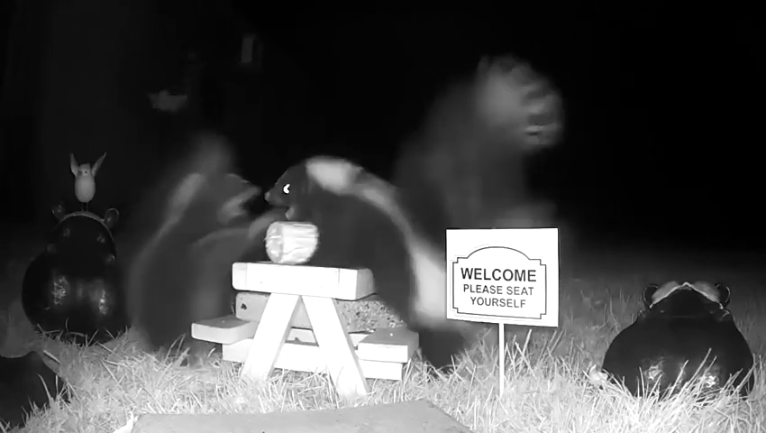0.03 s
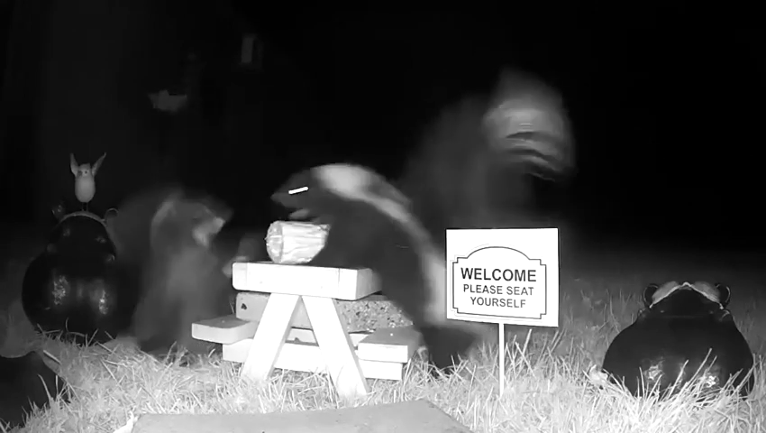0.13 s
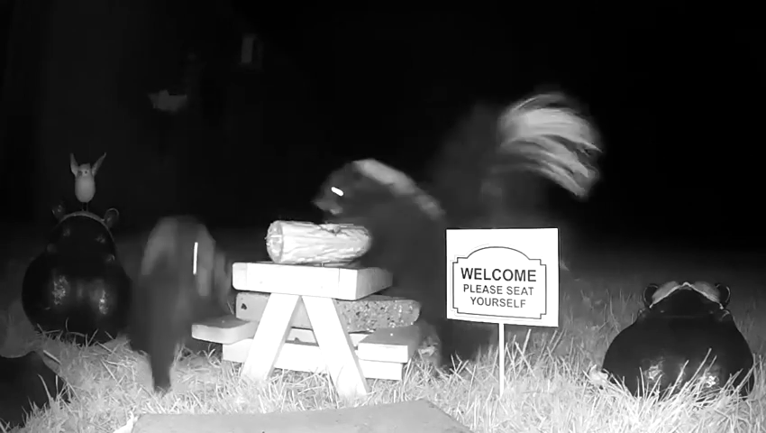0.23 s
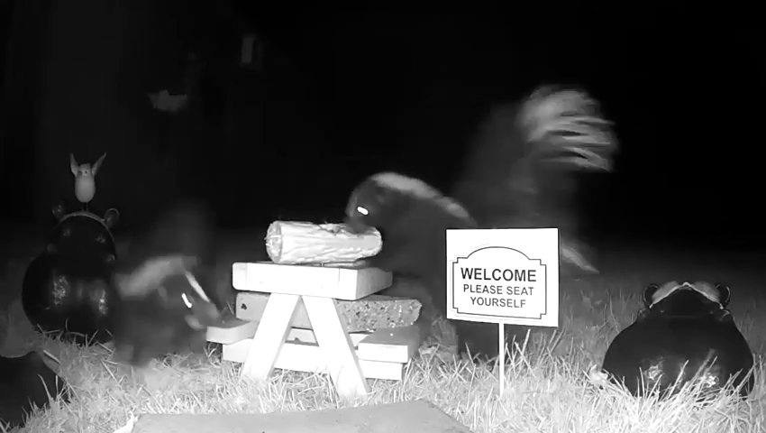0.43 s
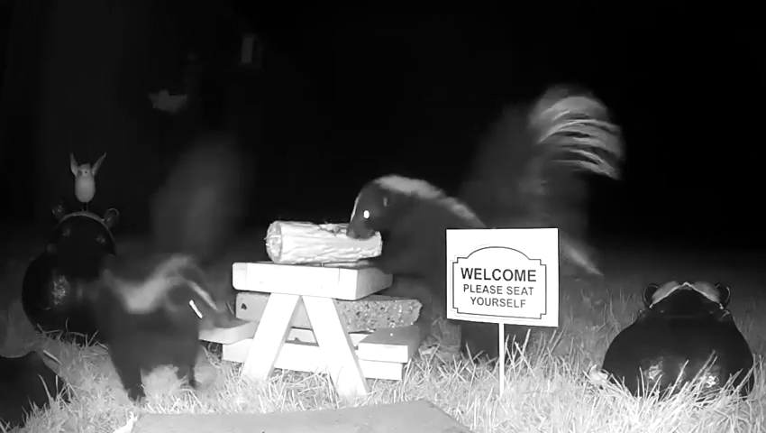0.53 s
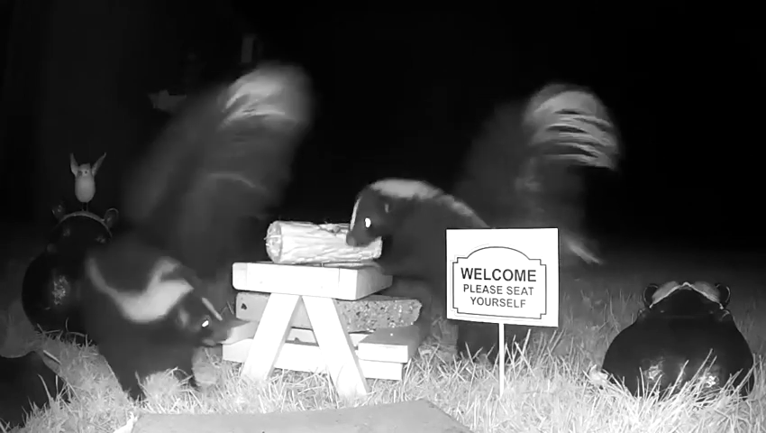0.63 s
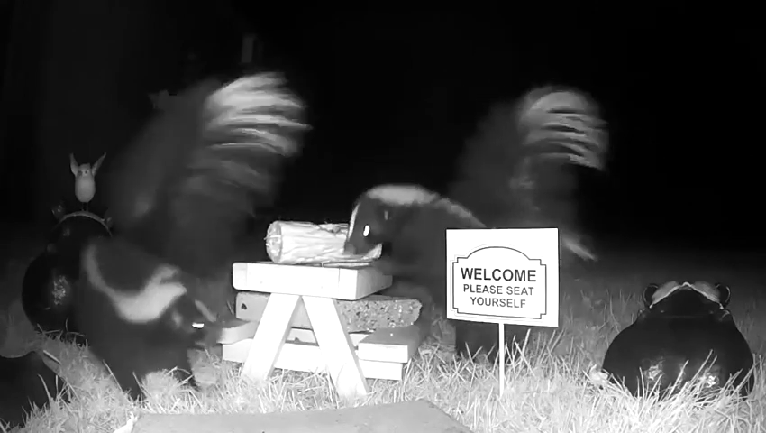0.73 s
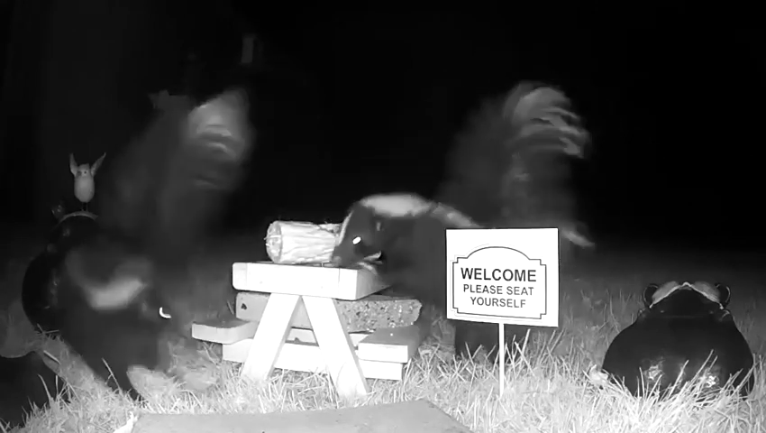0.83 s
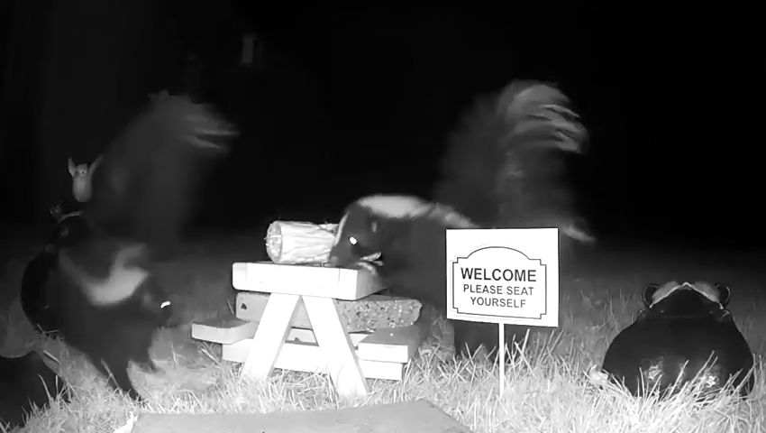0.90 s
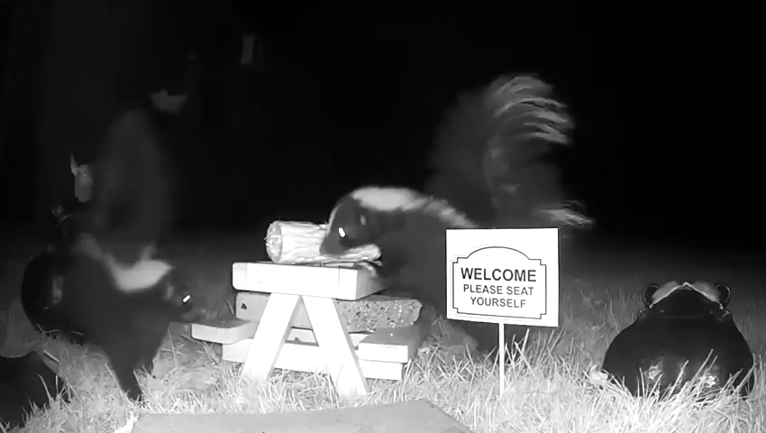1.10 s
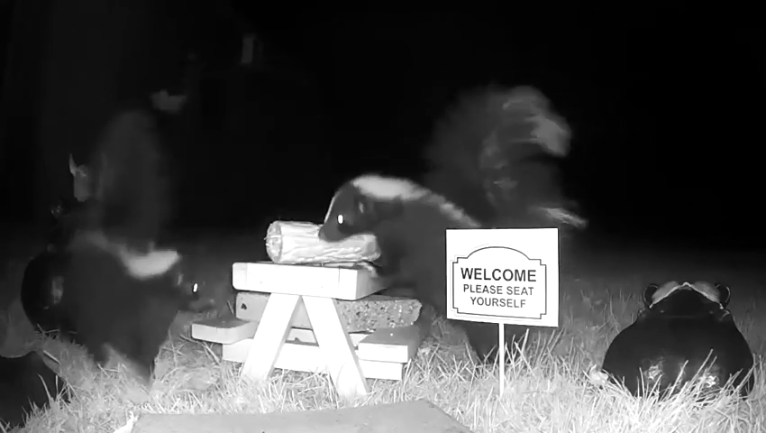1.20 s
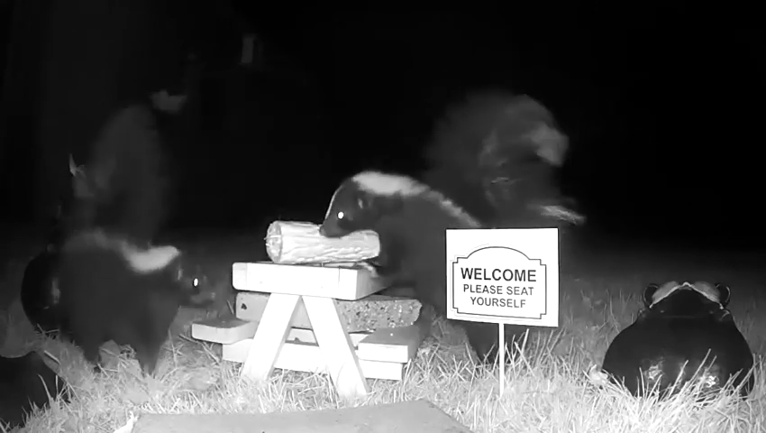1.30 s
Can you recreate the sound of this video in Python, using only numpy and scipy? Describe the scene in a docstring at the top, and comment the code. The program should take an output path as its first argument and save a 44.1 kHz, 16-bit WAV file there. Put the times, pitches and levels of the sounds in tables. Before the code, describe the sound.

A squabbling skunk chirps sharply twice, paws rustling and thumping in grass, steady low hiss behind

```python
"""Skunks squabbling at night

Two skunks squabble over food on a lawn, close to a small outdoor camera. One squeaks twice:
a shrill, wavering sine whistle that a fast flutter chops into bursts, loudest just before it stops.
Shaped noise makes the paws scuff and tick in the grass; fading sines make a stamp, knocks and footfalls.
Scattered reflections add a faint echo from the yard, over a steady hiss of shaped noise."""
import sys
import numpy as np
from scipy import signal
from scipy.fft import rfft, irfft
from scipy.io import wavfile

SR = 44100
rng = np.random.default_rng(int(sys.argv[2]) if len(sys.argv) > 2 else 0)


def wav_record(signal):
    """Record a signal, one row per channel, as 16-bit PCM in the file named by sys.argv[1]."""
    frames = np.transpose(np.atleast_2d(signal))
    bounded = np.clip(frames, -1, 1)
    # unit amplitude maps onto the largest positive 16-bit level
    quanta = np.round(bounded * 32767).astype(np.int16)
    wavfile.write(sys.argv[1], SR, quanta)


N = 59535
T = np.arange(N) / SR  # time of every sample [s]

# The two squeaks, before the throat filter: (time [s], level [dB], average flutter [Hz],
# whistle pitch [Hz], roughness [0-1], overtone level [dB], overtone pitch [Hz])
FIRST_SQUEAK = [(.2035, -12, 480, 4040, 0.34, -7, 7050), (.2055, -18.5, 520, 4100, 0.2, -11, 7080),
                (.213, -16.5, 468, 4743, 0.27, -12, 6650), (.2195, -13, 429, 4796, 0, -20, 7180),
                (.2232, -26, 440, 4810, 0.2, -5.5, 6350), (.227, -17, 500, 5030, 0, -6.5, 6290),
                (.2305, -4, 707, 4790, 0, -14, 6120), (.2355, -6, 716, 4660, 0.03, -24, 6350),
                (.2385, -32.5, 520, 4680, 0.16, 1.5, 6660)]
SECOND_SQUEAK = [(.538, -11, 386, 4200, 0.66, -5.5, 7060), (.541, -20, 370, 3435, 0.49, -0.5, 6870),
                 (.547, -15, 370, 3672, 0.83, -2.5, 6826), (.552, -15.5, 368, 4206, 0.78, -14.5, 6960),
                 (.558, -22, 371, 5164, 0.59, -5, 7030), (.563, -13, 388, 5095, 0.13, -23.5, 7030),
                 (.570, -18.5, 405, 4850, 0.23, -10.5, 6790), (.5772, -7.5, 545, 4753, 0.041, -20, 6450),
                 (.5815, -23, 446, 4306, 0.25, -10, 6550)]
# Rasp of the throat: (frequency [Hz], relative level [dB])
RASP_SPECTRUM = [(500, -37), (1700, -29), (2300, -2.5), (2750, -10), (3020, -10.5), (3200, -1.5),
                 (4400, -7.5), (5400, -8.5), (6000, -22.5), (6600, -12), (7700, -13), (9000, -25)]
# What a stamping paw rings with: (pitch [Hz], relative level [dB], time to fall 60 dB [s])
STAMP_MODES = [(371.4, 0, 0.032), (344.8, -24.5, 0.16), (851, -29, 0.053)]
# Paws dragged through grass: (start [s], length [s], crisp level [dB], dull level [dB])
SCUFF_STROKES = [(0, 0.025, -46, -51), (0.026, 0.065, -53.5, -56.5), (0.071, 0.057, -47, -55),
                 (0.129, 0.041, -47.5, -58.5), (0.173, 0.04, -54.5, -57.5), (0.214, 0.043, -41.5, -53.5),
                 (0.281, 0.047, -57, -61.5), (0.3444, .01, -51, -51.5), (0.355, 0.044, -49, -54),
                 (0.434, 0.08, -55.5, -72), (0.557, 0.054, -44, -55), (0.607, 0.03, -50, -65.5),
                 (0.891, .1, -59, -66), (0.905, 0.052, -58.5, -85)]
# Crisp sound of grass and stalks: (frequency [Hz], relative level [dB])
CRISP_SPECTRUM = [(300, -32), (1500, -24.5), (2300, 6), (3100, -13), (5200, 0), (7000, 3.5), (8000, -7)]
# Dull sound of turf: (frequency [Hz], relative level [dB])
DULL_SPECTRUM = [(30, -13.5), (60, 6.5), (150, -5), (350, -0.5), (550, -9.5), (950, -0.5), (1500, 1),
                 (2400, -9), (4000, -9.5), (8000, -35.5)]
# Dry stalks that snap: (time [s], level before halving [dB])
STALK_SNAPS = [(0.0132, -54), (0.0717, -39), (0.0918, -32), (0.141, -46), (0.152, -47.5), (.182, -28),
               (.2965, -37.5), (0.321, -33), (0.3495, -35), (0.462, -40), (0.474, -43), (0.4884, -38),
               (0.5307, -32.5)]
# Soft knocks on wooden things around the food:
# (time [s], pitch [Hz], starting level [dB], time to fall 60 dB [s])
WOOD_KNOCKS = [(.049, 1010, -45, 0.071), (0.1834, 2390, -42.5, .06), (.194, 330, -50.5, 0.11),
               (.228, 677, -38.5, 0.019), (.239, 897, -42, .06), (0.348, 1290, -44.5, .03),
               (0.371, 1442, -43.5, 0.037), (.905, 360, -55.5, 0.093), (.936, 347.4, -55, 0.12)]
# Footfalls in the turf: (time [s], level at the top of the swell [dB])
FOOTFALL_THUDS = [(0.133, -61.5), (0.204, -49.5), (0.246, -52), (0.316, -57), (0.374, -56.5),
                  (0.436, -56.5), (.58, -57), (0.908, -58.5)]
# A hard object ringing along: (pitch [Hz], time to fall 60 dB [s], level at resonance [dB])
OBJECT_RINGS = [(3035, .12, -7), (3530, .25, 2), (4372, .15, 0), (4870, .15, -22), (6772, .12, 0.5)]
# Reflections off nearby things: (delay [s], time to fall 60 dB [s], level [dB])
NEAR_REFLECTION = (.002, .05, -19.5)
# Reflections off the far side of the yard: (delay [s], time to fall 60 dB [s], level [dB])
FAR_REFLECTION = (.036, 0.24, -25.5)
# Tint of the far reflections: (frequency [Hz], relative level [dB])
FAR_SPECTRUM = [(100, 0), (2500, 3.5), (3600, 6), (4750, -4.5), (5600, -1), (8000, -8)]
# Steady hiss: (frequency [Hz], relative level [dB])
HISS_SPECTRUM = [(25, -3), (58, 0), (85, -5.5), (230, -12.5), (400, -12), (520, -17.5), (800, -14.5),
                 (1400, -16), (1850, -16.5), (2150, -8), (2450, -12), (2900, -16), (4800, -13), (6200, -13),
                 (7200, -6), (7800, -14.5), (9000, -55.5)]

BURST_S, EDGE_S = 0.00036, 0.0019  # spread of one burst; fade at each end of a squeak
JITTER = 0.089  # unevenness of the flutter, as a share of its rate
LEAK, ROUGH_LEAK = 0.022, 0.29  # share passing between bursts; extra share at full roughness
WAVER_HZ, OVERTONE_WAVER_HZ = 100.6, 204  # typical pitch waver at roughness 0.25
RASP_DB = -1.5
THROAT_HZ, THROAT_LEAK_DB = 2997, -11.5  # lower edge of the throat; what passes below it
STAMP_S, STAMP_DB, STAMP_RISE_S = .5755, -19.5, 0.0069
BLADES_PER_S, BLADE_SPREAD_DB = 5000, 2.5
SCUFF_UNEVEN_DB, SCUFF_UNEVEN_HZ = 2, 120
TICK_DECAY_S = 0.0017
KNOCK_RISE_S = 0.0038
THUD_HZ, THUD_SWELL_S, THUD_OVERTONE_DB = 52, 0.011, -8  # pitch before a random shift
FIRST_ECHO_DB, SECOND_ECHO_DB = -6.5, 1  # how much of each squeak is aimed at the far side
TAPS_PER_S = 3000  # average number of single reflections
HISS_DB = -58.5
CUT_HZ = 7900  # upper limit of the camera


def amp(db):
    """Turns decibels into a gain."""
    return 10 ** (np.asarray(db) / 20)


def unit(x):
    """Scales a sound to an average (rms) level of 1."""
    return x / np.sqrt(np.mean(x ** 2) + 1e-20)


def colour(x, points):
    """Weights the frequencies of x along a curve through the points, then sets rms 1."""
    hz, db = np.transpose(points)
    log_frequency = np.log(np.fft.rfftfreq(N, 1 / SR) + 1)
    gain = amp(np.interp(log_frequency, np.log(hz), db))
    return unit(irfft(rfft(x) * gain, N))


def wander(width_hz):
    """Makes a smooth random curve of rms 1; a larger width changes faster."""
    smoothing = np.exp(-(np.fft.rfftfreq(N, 1 / SR) / width_hz) ** 2)
    return unit(irfft(rfft(rng.standard_normal(N)) * smoothing, N))


def sine(hz):
    """Makes a sine that follows a pitch curve."""
    return np.sin(2 * np.pi * np.cumsum(hz) / SR)


def squeak(curve):
    """A whistle, its overtone and some rasp, let through in one burst per flutter."""
    times, *columns = np.transpose(curve)
    level_db, flutter, whistle_hz, rough, overtone_db, overtone_hz = (
        np.interp(T, times, column) for column in columns)
    rough = np.clip(rough, 0, 1)
    fade_in = np.clip((T - times[0]) / EDGE_S, 0, 1)
    fade_out = np.clip(1 + (times[-1] - T) / EDGE_S, 0, 1)

    uneven_flutter = flutter * (1 + JITTER * wander(300))
    turns = np.cumsum(uneven_flutter * (T > times[0])) / SR
    # Each burst is a bell shape that spans the end of one turn and the start of the next
    burst = sum(np.exp(-.5 * ((turns % 1 - k) / flutter / BURST_S) ** 2) for k in range(2))
    # Rough stretches close less well between bursts
    leak = np.clip(LEAK + ROUGH_LEAK * rough, 0, 1)
    opening = leak + (1 - leak) * burst

    waver = .5 + 2 * rough  # both tones waver more where the voice is rough
    tone = sine(whistle_hz + WAVER_HZ * waver * wander(500))
    overtone = amp(overtone_db) * sine(overtone_hz + OVERTONE_WAVER_HZ * waver * wander(500))
    rasp = amp(RASP_DB) * rough * colour(rng.standard_normal(N), RASP_SPECTRUM)
    voice = opening * np.sqrt(1 - rough ** 2) * tone + burst * overtone + np.sqrt(opening) * rasp
    return fade_in * fade_out * amp(level_db) * voice


def throat(x):
    """The small throat passes high sound and lets only a little through below its edge."""
    high_pass = signal.butter(10, THROAT_HZ, "highpass", fs=SR, output="sos")
    low_pass = signal.butter(10, THROAT_HZ, fs=SR, output="sos")
    return signal.sosfilt(high_pass, x) + amp(THROAT_LEAK_DB) * signal.sosfilt(low_pass, x)


def knock(start, hz, db, t60, rise_s):
    """A padded blow sets one pitch going: it rises softly and then dies away."""
    t = np.maximum(T - start, 0)
    rise = np.sin(np.pi / 2 * np.minimum(t / rise_s, 1)) ** 2
    return rise * amp(db - 60 * t / t60) * np.sin(2 * np.pi * hz * t)


def stamp():
    """A padded paw comes down: a soft rise and a short hollow ring."""
    return sum(knock(STAMP_S, hz, STAMP_DB + db, t60, STAMP_RISE_S) for hz, db, t60 in STAMP_MODES)


def blades():
    """Grass blades of uneven size make a dense crackle of single clicks."""
    size = amp(BLADE_SPREAD_DB * np.minimum(rng.exponential(1, N), 4))
    struck = rng.random(N) < BLADES_PER_S / SR
    return rng.standard_normal(N) * size * struck


def scuffs():
    """Each stroke swells and fades unevenly: crisp blades above, dull turf below."""
    crisp, dull = (colour(blades(), points) * amp(SCUFF_UNEVEN_DB * wander(SCUFF_UNEVEN_HZ))
                   for points in (CRISP_SPECTRUM, DULL_SPECTRUM))
    out = np.zeros(N)
    for start, length, crisp_db, dull_db in SCUFF_STROKES:
        progress = np.clip((T - start) / length, 0, 1)
        arch = np.sqrt(abs(np.sin(np.pi * progress)))
        out += arch * (amp(crisp_db) * crisp + amp(dull_db) * dull)
    return out


def ticks():
    """Dry stalks snap: each is a very short crisp burst of noise with a sudden start."""
    level = sum(amp(db) * (T >= start) * np.exp(-abs(T - start) / TICK_DECAY_S)
                for start, db in STALK_SNAPS)
    return .5 * level * colour(rng.standard_normal(N), CRISP_SPECTRUM)


def wood_knocks():
    """Soft blows on wooden things each set one fading pitch going."""
    return sum(knock(*row, KNOCK_RISE_S) for row in WOOD_KNOCKS)


def footfalls():
    """Each step pushes a short low thud through the ground."""
    out = np.zeros(N)
    for start, db in FOOTFALL_THUDS:
        t = np.maximum(T - start, 0)
        hz = THUD_HZ * rng.uniform(0.73, 1.2)
        overtone = amp(THUD_OVERTONE_DB) * np.sin(2 * np.pi * 2.5 * hz * t)
        wave = np.sin(2 * np.pi * hz * t) + overtone
        swell = t / THUD_SWELL_S * np.exp(1 - t / THUD_SWELL_S)
        out += amp(db) * swell * wave
    return out


def ring(x):
    """A nearby hard object picks up sound at a few narrow pitches and holds it a moment."""
    response = np.zeros(N)
    for hz, t60, db in OBJECT_RINGS:
        level_at_resonance = 2 * np.log(1000) / (t60 * SR)  # scaled so every ring reaches its own level at resonance
        response += amp(db - 60 * T / t60) * np.cos(2 * np.pi * hz * T) * level_at_resonance
    return signal.fftconvolve(x, response)[:N]


def reflect(x, delay, t60, db):
    """Sparse reflections begin after a delay and die away."""
    signs = rng.choice([-1., 1.], N)
    present = (rng.random(N) < TAPS_PER_S / SR) * (T > delay)
    taps = signs * present * amp(-60 * T / t60)
    taps = taps / (np.linalg.norm(taps) + 1e-20)
    return amp(db) * signal.fftconvolve(x, taps)[:N]


def far_echo(first, second, paws):
    """The far side of the yard returns each sound late, with its own tint."""
    aimed = amp(FIRST_ECHO_DB) * first + amp(SECOND_ECHO_DB) * second + paws
    echo = reflect(aimed, *FAR_REFLECTION)
    return np.std(echo) * colour(echo, FAR_SPECTRUM)  # the tint keeps the echo's overall level


def hiss():
    """Random noise with a fixed spectrum gives a steady hiss."""
    return amp(HISS_DB) * colour(rng.standard_normal(N), HISS_SPECTRUM)


def scene():
    """Adds up the animals, the ringing object, the reflections and the hiss."""
    first = throat(squeak(FIRST_SQUEAK))
    second = throat(squeak(SECOND_SQUEAK))
    paws = stamp() + scuffs() + ticks() + wood_knocks() + footfalls()
    animals = first + second + paws
    surroundings = ring(animals) + reflect(animals, *NEAR_REFLECTION) + far_echo(first, second, paws)
    return (animals + surroundings + hiss())[None]


def record(dry):
    """The camera's narrow band limit removes the highest sound."""
    low_pass = signal.firwin(181, CUT_HZ, window=("kaiser", 7), fs=SR)
    return signal.oaconvolve(dry, low_pass[None], "same")


dry = scene()
out = record(dry)
wav_record(out)
```